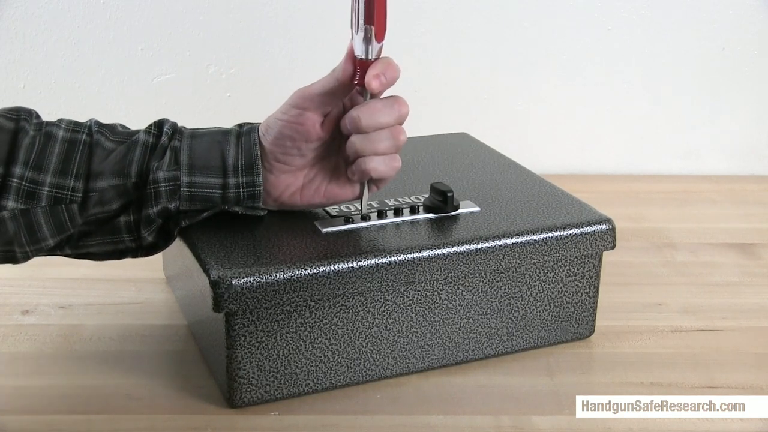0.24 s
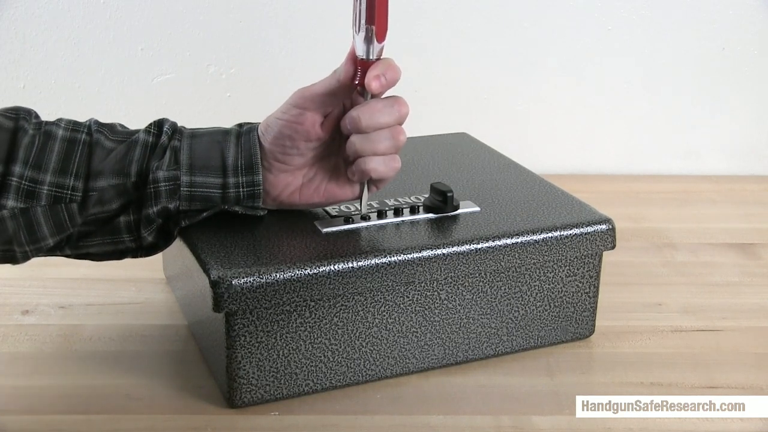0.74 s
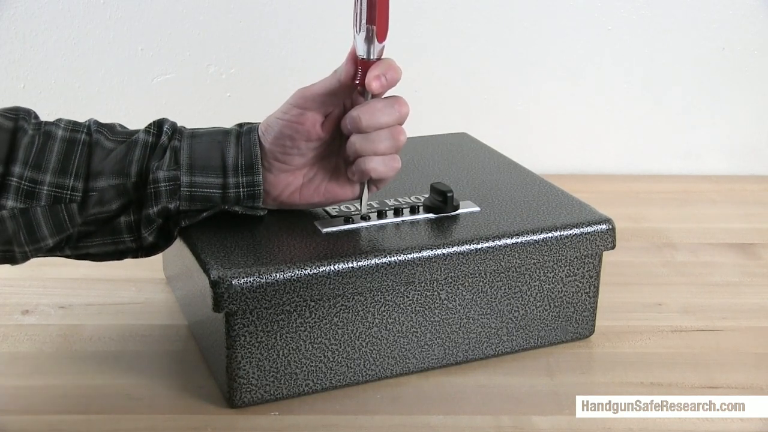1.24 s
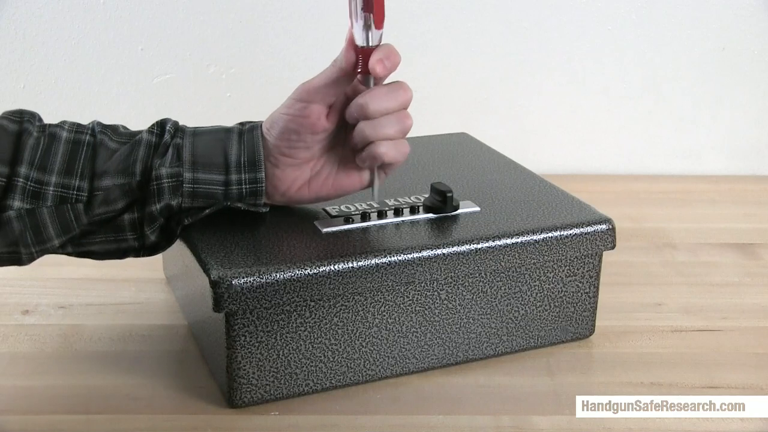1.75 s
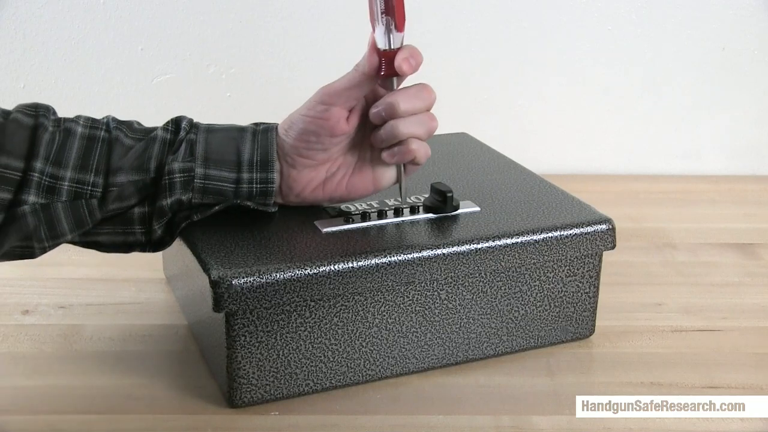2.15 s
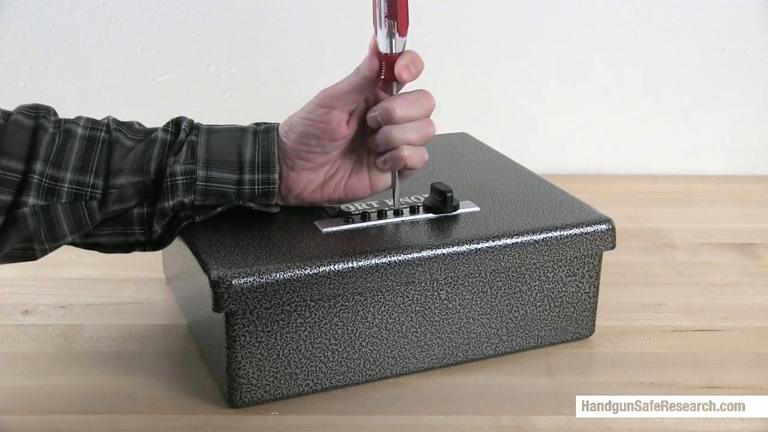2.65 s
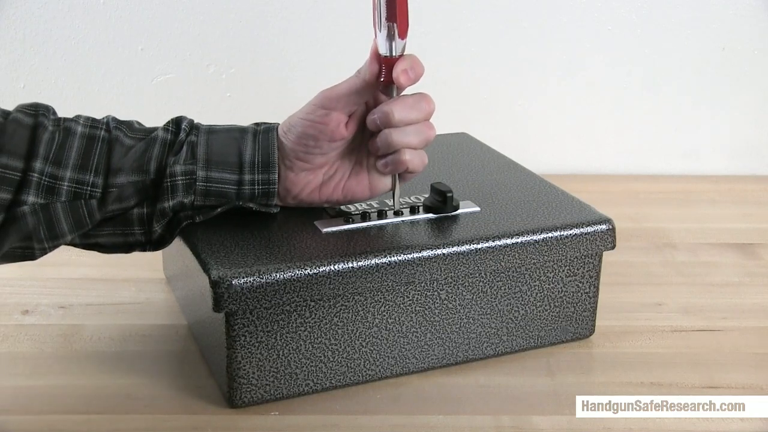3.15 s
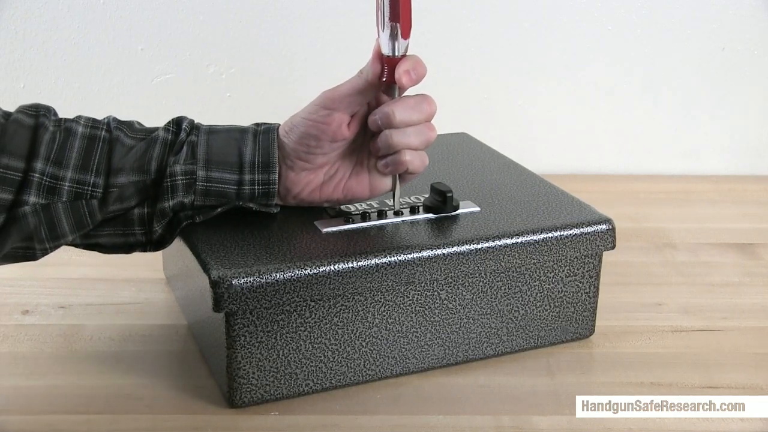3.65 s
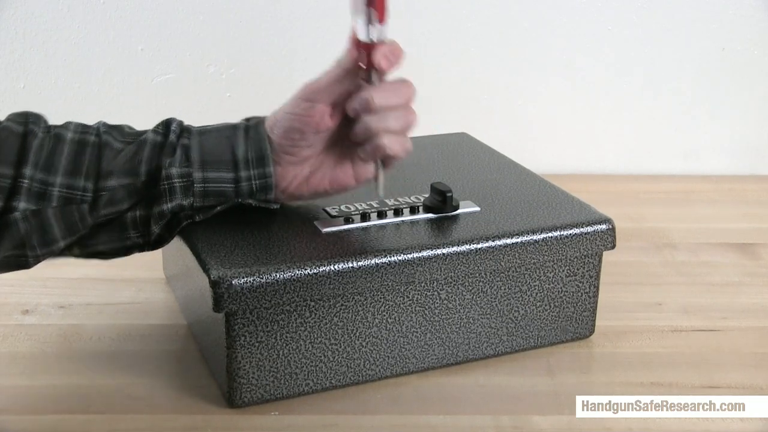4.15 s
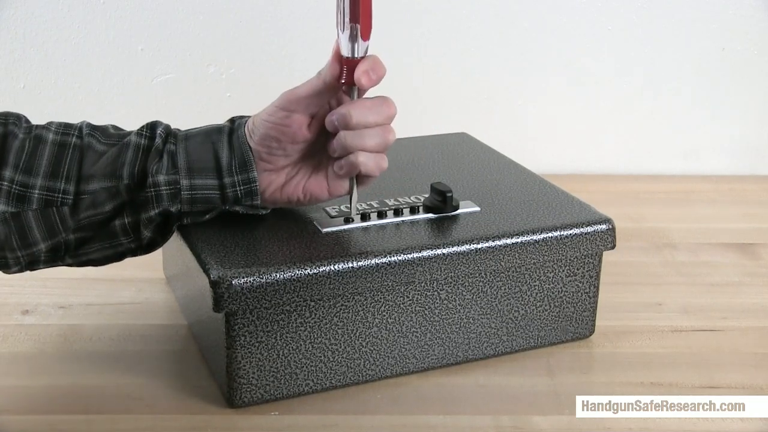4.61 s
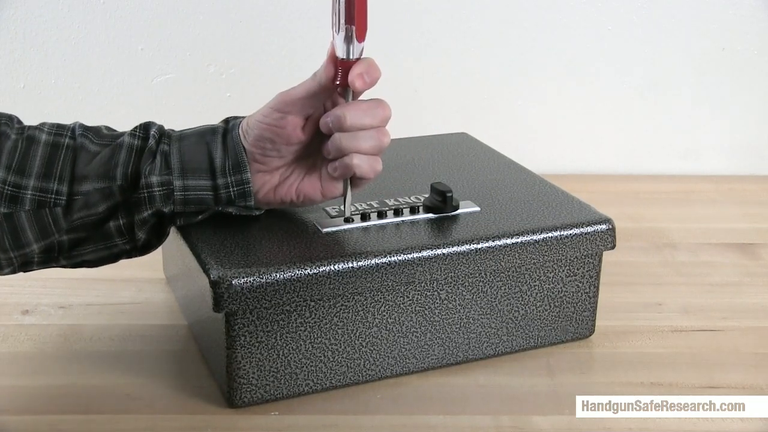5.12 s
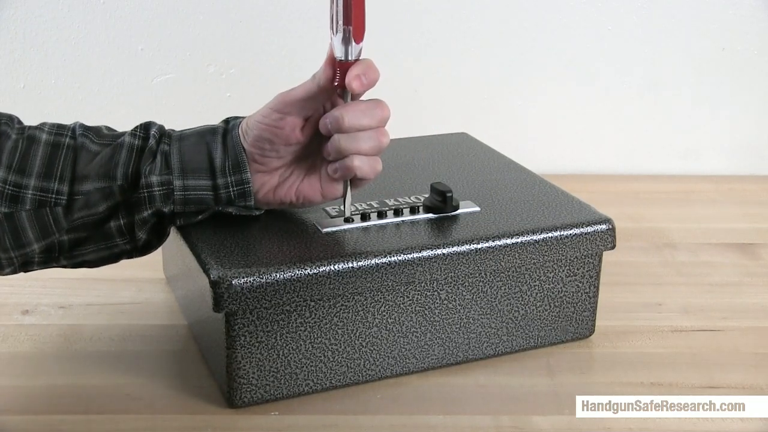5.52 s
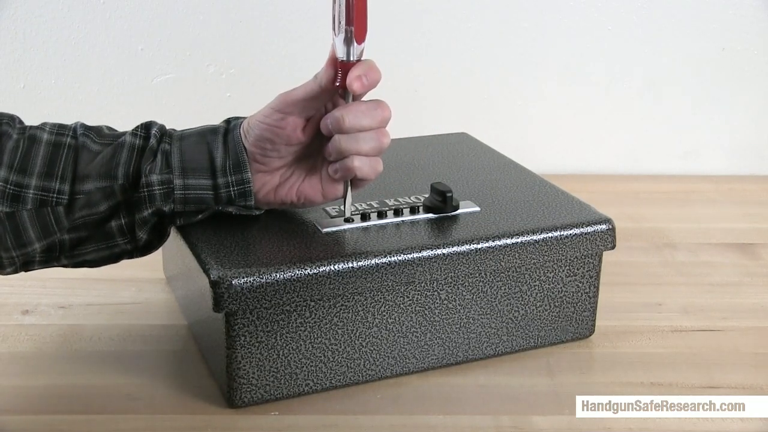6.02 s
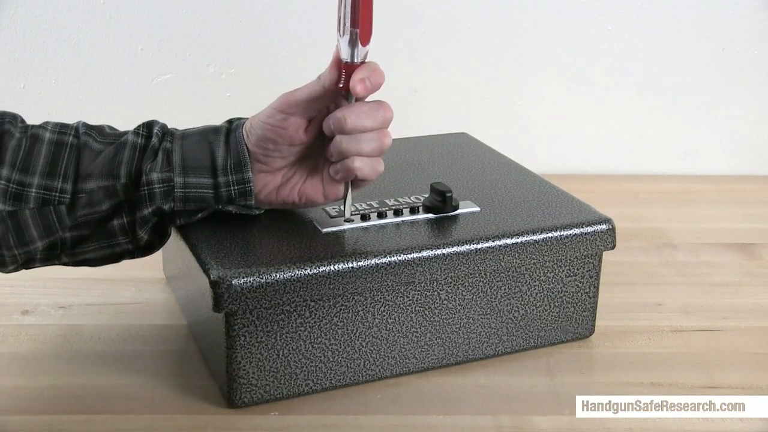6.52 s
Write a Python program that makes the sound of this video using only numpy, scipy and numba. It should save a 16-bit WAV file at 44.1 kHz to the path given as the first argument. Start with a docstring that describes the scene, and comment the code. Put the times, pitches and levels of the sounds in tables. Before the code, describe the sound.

Hammer on screwdriver against a metal box, heard at close range by a camera microphone. Light and hard strikes alternate at first, widely spaced; the final two are both hard. Hard ones are full, sharp and clanging, slightly squashed, with short reverberation; light ones are thin taps with a clearer ring. Between them the tip makes tiny ticks, small clacks and muffled thuds. Quiet low hum dips and swells slightly underneath.

```python
"""In a small bare room, a claw hammer drives a screwdriver onto the buttons of a steel lock box on a wooden table.
Light and hard blows, and the tip set down between them, excite damped box modes, a burst of dense modes and an echo;
soft thuds and faint ticks are filtered bursts and rough sines, and the hum and hiss are coloured noise.
A camera limits the peaks, a noise suppressor ducks the room hum, and the level is turned down around hard blows."""
import sys
import numpy as np
from scipy import signal
from scipy.fft import rfft, irfft
from scipy.io import wavfile
from scipy.ndimage import uniform_filter1d
from numba import njit

SR = 44100
rng = np.random.default_rng(int(sys.argv[2]) if len(sys.argv) > 2 else 0)


def transcribe(signal):
    """Save signal, clipped to [-1, 1], as a 16-bit WAV file at the path in sys.argv[1]."""
    frames = np.atleast_2d(signal).T
    limited = np.clip(frames, -1, 1)
    pcm = np.round(limited * 32767).astype(np.int16)
    wavfile.write(sys.argv[1], SR, pcm)


N = 298557  # length of the scene in samples
T = np.arange(1 << 15) / SR  # time axis of one contact, s
HZ = np.maximum(np.fft.rfftfreq(len(T), 1 / SR), 1)  # its frequency axis, Hz
SHORT_T = T[:2048]  # time axis of the short clicks, s

# Colour of the steady noise. Each row: frequency in Hz, relative density in dB per Hz.
HUM_COLOUR = [(20, -3.5), (48, 0), (81, -5.5), (107, 0.5), (138, -7), (228, -5), (270, -10), (485, -14),
              (976, -15.5), (1400, -19.5), (1850, -22.5), (2300, -32), (3000, -34.5), (16000, -39.5)]
# Slow drift of the hum. Each row: time in seconds, gain in dB.
HUM_DRIFT = [(0, -1.2), (1.2, 0.1), (2.1, 1), (2.7, -0.4), (3.8, -1.4), (4.7, -1), (5.3, -0.5), (6.1, -1.7),
             (6.77, -1.5)]
HUM_DB = -44  # rms of hum and hiss before the drift and the recorder

# Echo of the room. Each row: frequency in Hz, decay time t60 in seconds, colour in dB.
ROOM_ECHO = [(40, 0.63, -4), (119, 0.25, -1), (294, 0.39, 5), (800, 0.46, 1.5), (1990, 0.43, -0.5),
             (4970, 0.41, -1.5), (8834, 0.31, -1.5), (15300, 0.21, 1.4)]

# Faint ticks of the tip on the steel. Each row: start in seconds, level in dB, pitch in Hz.
TICKS = [(.114, -58, 4720), (.224, -56, 3360), (2.428, -57.5, 4290), (2.494, -52.5, 5150)]

# Dull thuds as the hand's weight follows the tip.
# Each row: start in seconds, level in dB, lift of the boom in dB, lift of the body in dB.
THUDS = [(.3600, -45.5, 18, 25), (3.0830, -42, -2, 1.8), (5.7740, -34.5, 24, 1)]
THUD_TREBLE_DB, THUD_TOP_DB, THUD_RISE_MS, THUD_ECHO_DB = -29.5, -21, 3.5, 11

# The tip set down on a button. Each row: start in seconds, level in dB, lift of the boom in dB,
# rise in ms, button and shaft in dB relative to the level.
SET_DOWNS = [(0.3428, -40.5, 3, 2.1, -7), (2.9575, -45, -10.5, 0.83, -6), (3.0498, -37.5, 1, 0.43, -12.5),
             (5.7580, -37, 4, 1.55, -9)]
TIP_BODY_DB, TIP_TREBLE_DB, TIP_TOP_DB, TIP_ECHO_DB = -4.5, -11, 10, -2

# Hammer blows. Each row: start in seconds, level in dB, lift of treble and top in dB, rise in ms,
# button and shaft in dB and hammer face in dB, both relative to the level.
BLOWS = [(0.8402, -16.5, 3, 3.5, -12, -29.5), (1.458, 4.5, 1, 1.9, -7.5, -34),
         (3.4035, -17.5, -1, 1.7, -10.5, -56), (3.9870, 4.5, -3, 1.6, -12, -37),
         (6.3682, 2.5, 1.5, 2.3, -10.5, -35)]
# A harder blow is fuller, brighter and wetter, and the lid's clang stands out less.
# Each of the two rows: level in dB, lifts of boom, body, treble and top in dB, echo in dB, lift of the clang in dB.
LIGHT_BLOW = (-17, 3.7, -5.5, -6.5, -13.5, -4.5, 14)
HARD_BLOW = (6.5, 0.5, -3.5, 3.5, 9.5, -0.15, 0.5)

# Short rings of button and screwdriver shaft. Each row: frequency in Hz, width in Hz, relative peak in dB.
SHAFT_MODES = [(1210.4, 45, 0.8), (1600, 220, -10.5), (2390, 260, -21.5), (3150, 130, -18.5),
               (3470, 160, -19.5), (5700, 300, -27), (9540, 400, -32.5), (13200, 300, -33)]
# Separate modes of the steel box. Each row: frequency in Hz, width in Hz, relative peak in dB.
BOX_MODES = [(97.9, 72, -1.5), (175, 33, -4.5), (239.5, 6, 5.5), (299.6, 14, -6), (332, 10, 0),
             (378, 15, 0.5), (538, 21, -7), (659, 35, -5), (759, 14, -4.5), (942, 18, -10), (1225, 14, -9),
             (1588.6, 57, -12), (1758.6, 14, -9), (1875, 11, -7), (2060, 16, -15.5), (2500, 27, -10),
             (3070, 50, -22.5), (3634, 41, -12), (3940, 40, -27.5), (4440, 38, -17), (5024, 18, -10.5),
             (6680, 51, -26.5), (7990, 30, -27)]
# The many close modes of lid, lock and table. Each row: frequency in Hz, relative density in dB per Hz.
DENSE_COLOUR = [(18, -42), (30, -10), (299, -0.5), (479, -8), (1050, -10.5), (1200, -10), (1720, -16.5),
                (1870, -12.5), (2760, -18), (3680, -18.5), (4780, -23.5), (11300, -38), (15500, -51)]
# Decay of these close modes. Each row: frequency in Hz, decay time t60 in seconds.
DENSE_T60 = [(100, .15), (400, 0.13), (1500, 0.041), (5000, 0.072), (14000, 0.023)]

# Spans turned down around each hard blow. Each row: start in seconds, end in seconds.
DIPS = [(1.4400, 1.8870), (3.9675, 4.3870), (6.3570, 6.77)]
DIP_DB, TOP_HZ = -9.6, 16050  # gain in a dip; upper edge of the band


def undb(db):
    """Decibels to amplitude ratio."""
    return 10 ** (np.asarray(db) / 20)


def unit(x):
    """Scaling to unit energy."""
    return x / np.linalg.norm(x)


def unit_start(x):
    """Scaling to an energy that gives rms 1 if spread over 30 ms."""
    return unit(x) * np.sqrt(.03 * SR)


def add(track, s, sound):
    """Superposition: a sound joins the track at s seconds."""
    i = int(s * SR)
    track[i:i + len(sound)] += sound[:len(track) - i]


def on_log(hz, table, col=1):
    """Linear interpolation of a table column on a log-frequency axis."""
    table = np.array(table)
    return np.interp(np.log(hz), np.log(table[:, 0]), table[:, col])


def causal(db):
    """Minimum-phase response: the folded cepstrum gives the shortest delay for the gain db on HZ."""
    cep = irfft(db * np.log(10) / 20)
    cep[1:len(T) // 2] *= 2
    cep[len(T) // 2 + 1:] = 0
    return np.exp(rfft(cep))


def fading_noise(t60, size=256):
    """Frequency-dependent damping: white noise decays at the rate of its (Hz, t60) table."""
    hz, t, cells = signal.stft(rng.standard_normal(len(T)), SR, nperseg=size)
    seconds = np.clip(on_log(np.maximum(hz, 1), t60), .01, 2)[:, None]
    fall_db = -60 * t / seconds
    return signal.istft(cells * undb(fall_db), SR, nperseg=size)[1][:len(T)]


def modal_ring(modes, t, lift=((1, 0),), clang_db=0, scatter_db=1.0):
    """Modal superposition: each resonance is a sine whose damping rate is pi times its width."""
    hz, width, db = np.transpose(modes)[:, :, None]
    db = db + on_log(hz, lift) + scatter_db * rng.standard_normal(hz.shape)
    db += clang_db * np.exp(-((hz - 1840) / 150) ** 2)  # the lid's pair of long modes
    # the factor width makes db the height of the spectral peak
    partials = undb(db) * width * np.exp(-np.pi * width * t) * np.sin(2 * np.pi * hz * t)
    return partials.sum(axis=0)


def hum():
    """Stationary coloured noise: air and motor noise drifts below 2.5 kHz, microphone hiss is steady above."""
    hz = np.fft.rfftfreq(N, 1 / SR)
    spectrum = rfft(rng.standard_normal(N)) * undb(on_log(np.maximum(hz, 1), HUM_COLOUR))
    air = irfft(spectrum * (hz < 2500), N)
    hiss = irfft(spectrum * (hz >= 2500), N)
    drift_db = np.interp(np.arange(N) / SR, *np.transpose(HUM_DRIFT))
    return undb(HUM_DB) * (undb(drift_db) * air + hiss) / (air + hiss).std()


def room(gap_s=0.003):
    """Diffuse reverberation: the spectrum of a dense decaying echo that starts after a short gap."""
    echo = fading_noise(ROOM_ECHO) * np.clip(T / gap_s - 1, 0, 1)
    return rfft(unit(irfft(rfft(echo) * causal(on_log(HZ, ROOM_ECHO, col=2)))))


def tick(hz, t60=0.041, rough=5.2, click_db=-6, click_s=.004):
    """Amplitude modulation by noise roughens a short high ring; differenced noise adds a broad click."""
    grain = 1 + rough * uniform_filter1d(rng.standard_normal(len(T)), size=12)
    ring = grain * np.sin(2 * np.pi * hz * T) * undb(-60 * T / t60)
    click = undb(click_db) * np.diff(rng.standard_normal(len(T) + 1)) * np.exp(-T / click_s)
    return (ring + click) * np.clip(T / .003, 0, 1)


def face(centre_hz=12100, width_hz=3000, t60_s=0.018, rise_s=0.0028):
    """Band-limited impact noise: the thin click of the steel hammer face on the plastic handle."""
    edges = [centre_hz - width_hz / 2, centre_hz + width_hz / 2]
    click = rng.standard_normal(len(SHORT_T)) * undb(-60 * SHORT_T / t60_s) * np.clip(SHORT_T / rise_s, 0, 1)
    return unit_start(signal.sosfilt(signal.butter(2, edges, "band", fs=SR, output="sos"), click))


def shaft(chatter_s=.0055):
    """Stick-slip excitation: the tip skids and chatters for a few ms and rings button and shaft."""
    ring = modal_ring(SHAFT_MODES, SHORT_T)
    chatter = rng.standard_normal(len(SHORT_T)) * SHORT_T * np.exp(-2 * SHORT_T / chatter_s)
    return unit_start(signal.fftconvolve(ring, chatter)[:len(SHORT_T)])


def contact(echo, boom_db, body_db, treble_db, top_db, rise_ms, echo_db, clang_db, ring_db=-4.5, dense_db=-0.5,
            boom_hz=160, boom_s=.012):
    """Impact excitation: box modes and dense modes build up while the tip bites, then the room answers."""
    lift = [(90, boom_db), (300, body_db), (1200, 0.0017), (5000, treble_db), (13000, top_db)]
    t = T[:len(T) // 4]
    ring = modal_ring(BOX_MODES, t, lift, clang_db)
    modes = undb(ring_db) * np.pad(unit(ring), (0, len(T) - len(t)))
    colour = causal(on_log(HZ, DENSE_COLOUR) + on_log(HZ, lift))
    dense = undb(dense_db) * unit(irfft(colour * rfft(fading_noise(DENSE_T60))))
    # the walls hear the dense modes from all sides, so only their smooth colour reaches the echo
    answer = irfft(rfft(modes + unit(irfft(colour))) * echo)
    sound = modes + dense + undb(echo_db) * answer
    # box walls and table top are heavy and take longer to start moving
    boom = signal.sosfilt(signal.butter(2, boom_hz, fs=SR, output="sos"), sound)
    bite = np.clip(T * 1000 / rise_ms, 0, 1)
    sound = bite * (sound - boom * np.exp(-T / boom_s))
    return sound / np.sqrt(np.mean(sound[T < .03] ** 2))  # rms 1 over the first 30 ms


def thud(boom_db, body_db):
    """Low-frequency loading: a contact with weak treble, as the hand's weight follows the tip."""
    return contact(room(), boom_db, body_db, THUD_TREBLE_DB, THUD_TOP_DB, THUD_RISE_MS, THUD_ECHO_DB, 0)


def set_down(boom_db, rise_ms, shaft_db):
    """Light impact: the tip meets a button, and box and shaft ring together."""
    sound = contact(room(), boom_db, TIP_BODY_DB, TIP_TREBLE_DB, TIP_TOP_DB, rise_ms, TIP_ECHO_DB, 0)
    add(sound, 0, undb(shaft_db) * shaft())
    return sound


def hammer_blow(db, bright_db, rise_ms, shaft_db, face_db):
    """Force-dependent spectrum: the blow's level sets its tone between the light and the hard one."""
    force = np.clip((db - LIGHT_BLOW[0]) / (HARD_BLOW[0] - LIGHT_BLOW[0]), 0, 1)
    tone = (1 - force) * np.array(LIGHT_BLOW[1:]) + force * np.array(HARD_BLOW[1:])
    boom, body, treble, top, echo, clang = tone
    sound = contact(room(), boom, body, treble + bright_db, top + bright_db, rise_ms, echo, clang)
    add(sound, 0, undb(face_db) * face())
    add(sound, rise_ms / 1000, undb(shaft_db) * shaft())  # the button bottoms out
    return sound


def scene():
    """Superposition of ticks, thuds, the tip set down and hammer blows over the hum."""
    dry = hum()
    for s, db, hz in TICKS:
        add(dry, s, undb(db) * tick(hz))
    for s, db, boom_db, body_db in THUDS:
        add(dry, s, undb(db) * thud(boom_db, body_db))
    for s, db, boom_db, rise_ms, shaft_db in SET_DOWNS:
        add(dry, s, undb(db) * set_down(boom_db, rise_ms, shaft_db))
    for s, db, bright_db, rise_ms, shaft_db, face_db in BLOWS:
        add(dry, s, undb(db) * hammer_blow(db, bright_db, rise_ms, shaft_db, face_db))
    return dry[None]


@njit
def follow(x, attack, release):
    """Envelope detection: one-pole smoothing that rises fast and falls slowly."""
    out, e = np.empty(len(x)), 1e-9
    for i in range(len(x)):
        e += (abs(x[i]) - e) * (attack if abs(x[i]) > e else release)
        out[i] = e
    return out


def limit(x, threshold_db=-2.35, ratio=1.4, attack_s=0.0005, release_s=0.042, ceiling=2.5):
    """Dynamic compression: gain falls above the threshold, then a hyperbolic tangent clips softly."""
    level = follow(x, 1 / (attack_s * SR), 1 / (release_s * SR))
    x = x * np.minimum(1, (undb(threshold_db) / level) ** (1 - 1 / ratio))
    return ceiling * np.tanh(x / ceiling)


def suppress(x, over_db=8, knee_db=4, depth_db=11, open_db_s=110, close_db_s=130, size=1024):
    """Spectral gating: cells near the noise floor are ducked; gain opens before a sound and closes after it."""
    hop = size // 4
    cells = signal.stft(x, nperseg=size, noverlap=size - hop)[-1]
    power = uniform_filter1d(np.abs(cells) ** 2, size=9, axis=0) + 1e-20
    floor = np.median(power, axis=1, keepdims=True)
    over = 10 * np.log10(power / floor)
    gain_db = depth_db * (np.clip((over - over_db) / knee_db, 0, 1) - 1)
    # one loop limits the fall after a sound (forward) and the rise before it (backward)
    for k in range(1, len(gain_db.T)):
        gain_db[:, k] = np.maximum(gain_db[:, k], gain_db[:, k - 1] - close_db_s * hop / SR)
        gain_db[:, -k - 1] = np.maximum(gain_db[:, -k - 1], gain_db[:, -k] - open_db_s * hop / SR)
    return signal.istft(cells * undb(gain_db), nperseg=size, noverlap=size - hop)[-1][:N]


def record(dry):
    """Signal chain in series: camera limiter, noise suppressor, level dips, elliptic low-pass."""
    x = suppress(limit(dry[0]))
    for start, end in DIPS:
        x[int(start * SR):int(end * SR)] *= undb(DIP_DB)
    return signal.sosfilt(signal.ellip(10, .2, 70, TOP_HZ, fs=SR, output="sos"), x)[None]


dry = scene()
out = record(dry)
transcribe(out)
```